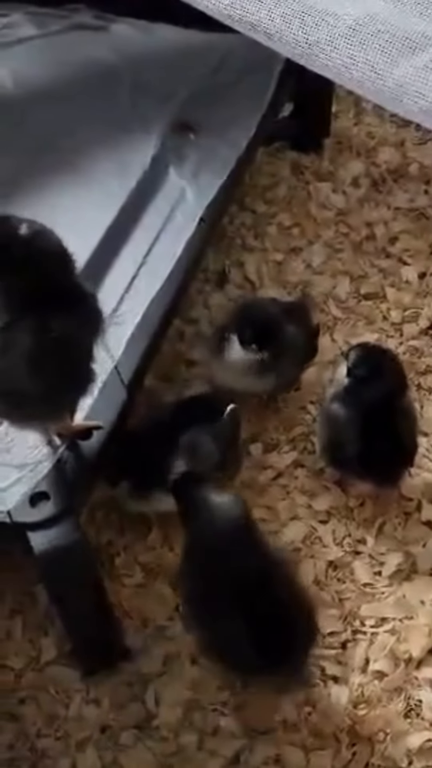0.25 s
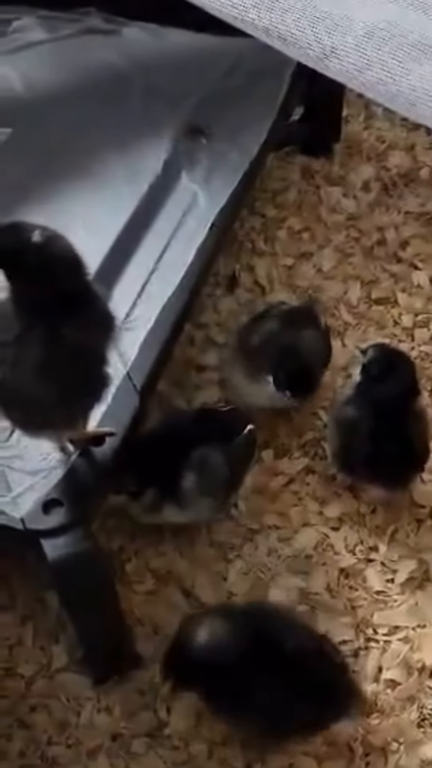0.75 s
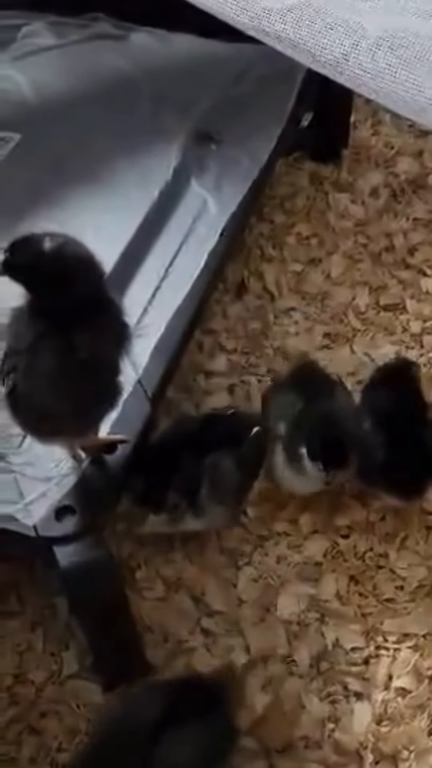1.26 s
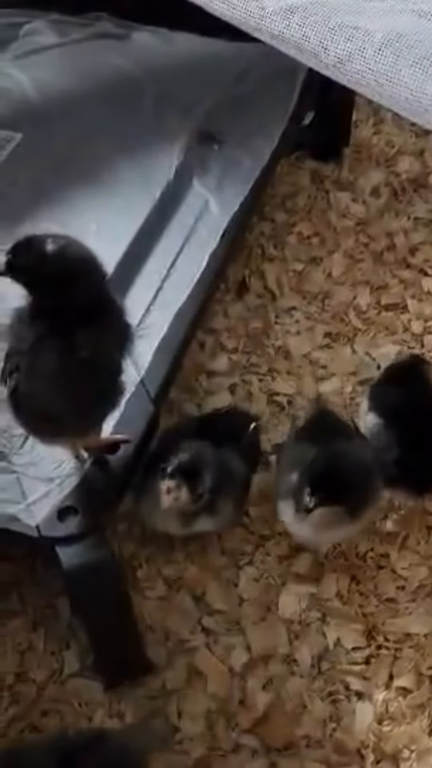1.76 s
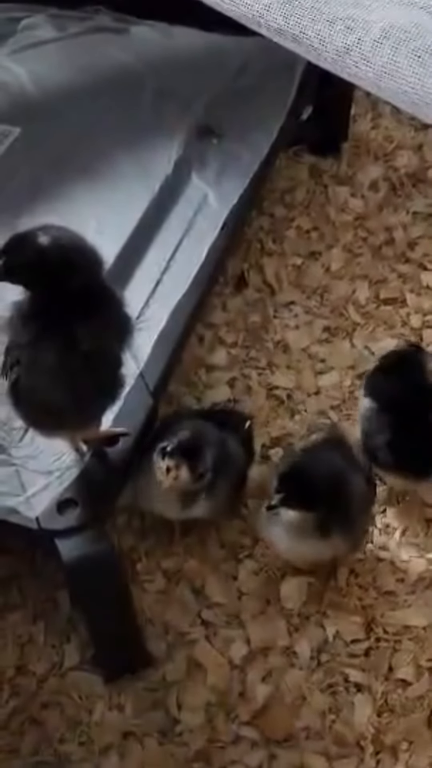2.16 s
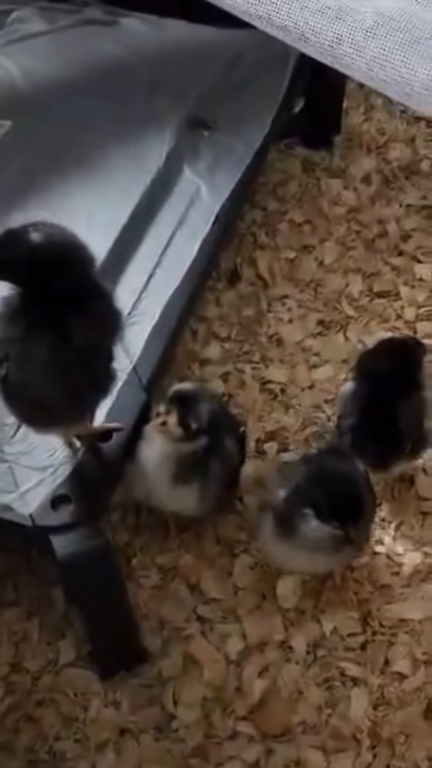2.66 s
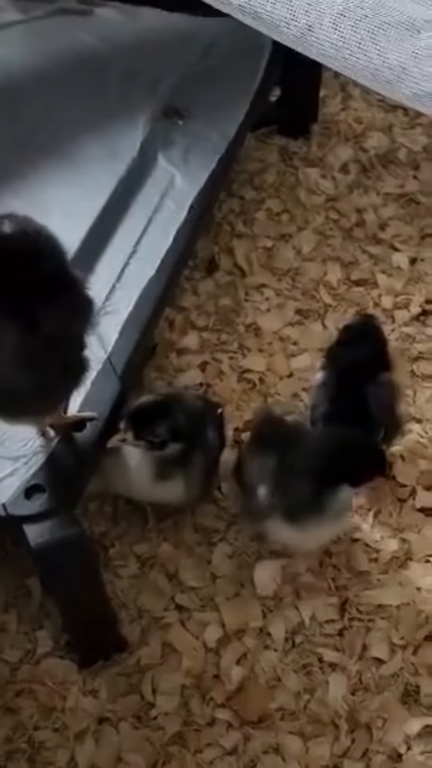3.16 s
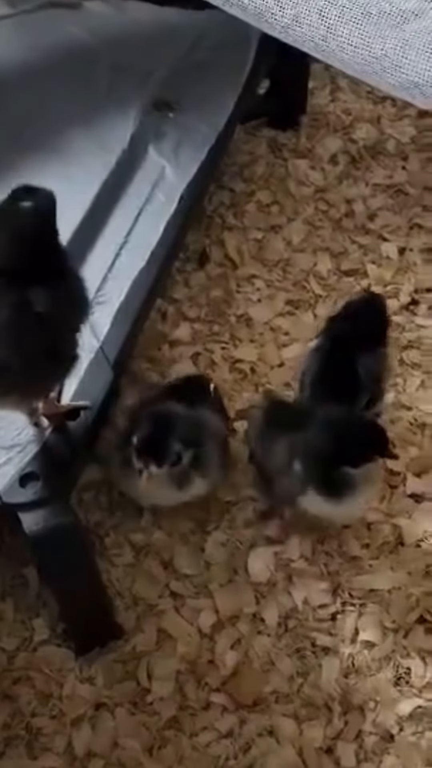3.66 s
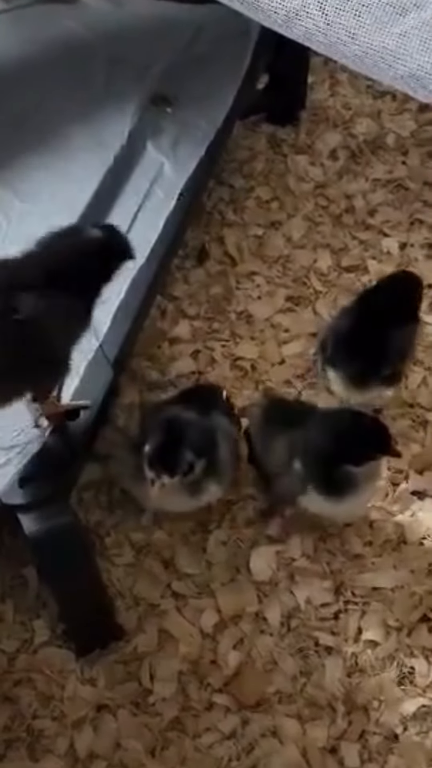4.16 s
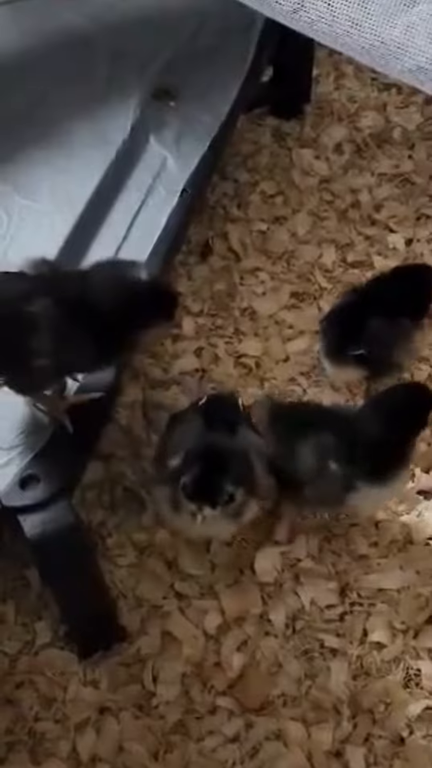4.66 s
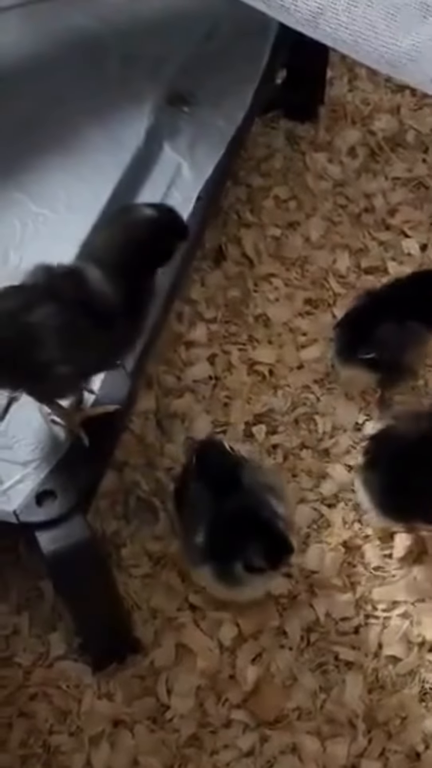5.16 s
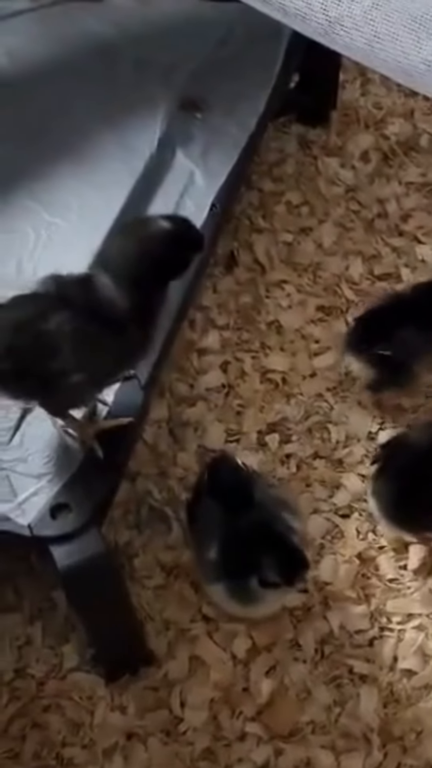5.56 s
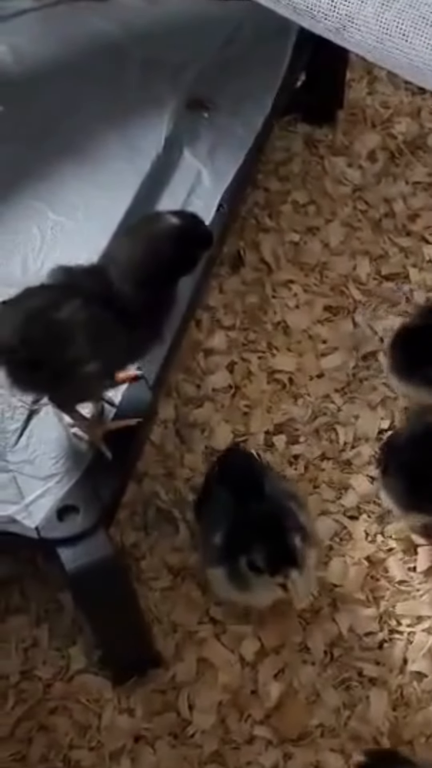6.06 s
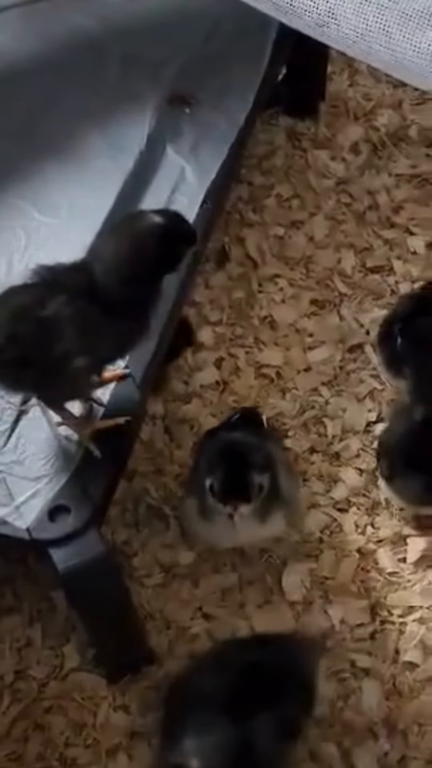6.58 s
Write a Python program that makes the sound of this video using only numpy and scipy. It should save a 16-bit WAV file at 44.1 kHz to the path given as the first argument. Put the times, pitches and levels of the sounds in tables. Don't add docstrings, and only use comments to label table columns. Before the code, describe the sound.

A low, steady fan rush with a faintly wavering motor hum runs throughout, under a dry whisper of feet in wood shavings. From 0.1 s a keen chick gives short falling whistles, with softer, lower peeps from another at 0.4-0.7 s. The keen one returns at 0.9-1.6 s, climbing in pitch, and again at 2.0-2.2 s among faint distant peeps, with a last one at 2.7 s. Crisp shavings tick at 2.25 s. Around 2.9-3.1 s small metal tags begin jingling close by, with a dull plate knock, then brighter hard shakes at 3.4-3.65 s. After a quieter gap another sharp clash comes at 4.2 s. A near chick peeps loudly at 4.6-5.0 s; far peeps and scuffs follow to 6 s. Jingles burst again at 5.9, 6.03 and 6.2-6.3 s, ringing briefly in the small soft room before rustling ends it.

```python
import sys
import numpy as np
from scipy import signal
from scipy.fft import rfft, irfft
from scipy.io import wavfile
from scipy.ndimage import uniform_filter1d

SR = 44100
rng = np.random.default_rng(int(sys.argv[2]) if len(sys.argv) > 2 else 0)


def waveform_to_disk(signal):
    frames = np.transpose(np.atleast_2d(signal))
    scaled = np.clip(frames, -1, 1) * 32767
    samples = np.round(scaled).astype(np.int16)
    wavfile.write(sys.argv[1], SR, samples)


def gain_from_db(level_db):
    decades = np.asarray(level_db, float) / 20
    return 10 ** decades


N = 300762

# (frequency [Hz], level [dB per Hz])
TAG_COLOUR = [(1760, -116), (3000, -90), (3360, -17), (3810, -23.5), (6600, -14.5), (8980, -5.5),
              (12400, 10.5), (13400, -1)]
SCUFF_COLOUR = [(240, -56), (400, -20.5), (1700, -4), (1950, -5), (2600, -5.5), (3050, -18), (3600, -12.5),
                (5000, -9), (6500, -60), (11000, -120)]
SHAVINGS_COLOUR = [(1760, -35.5), (3000, -10), (3510, -9), (5400, -12.5), (7410, -1.5), (9670, -8.5),
                   (12300, 0.5), (13200, -7), (13600, -20.5)]


def evened(x):
    return x / np.sqrt(np.mean(x ** 2) + 1e-20)


def read(points, hz):
    f, value = np.transpose(points)
    return np.interp(np.log(hz + 1), np.log(f + 1), value)


def add(mix, s, sound):
    part = mix[..., round(s * SR):][..., :sound.shape[-1]]
    part += sound[..., :part.shape[-1]]


def play_all(source, table):
    mix = np.zeros((2, N))
    for row in table:
        add(mix, *source(*row))
    return mix


def coloured(x, points):
    gain = gain_from_db(read(points, np.fft.rfftfreq(x.shape[-1], 1 / SR)))
    return irfft(rfft(x) * gain, x.shape[-1])


def contacts(count, per_s, spread_db):
    when, size, sign = rng.random((8000, 3))[:count].T
    strength = gain_from_db(spread_db * np.minimum(-np.log(size + 1e-9), 3))
    return (when < per_s / SR) * strength * np.sign(sign - .5)


def ports(x, pan_db, lag):
    left = np.interp(np.arange(len(x)) - lag, np.arange(len(x)), x)
    return np.array([left * gain_from_db(pan_db / 2), x * gain_from_db(-pan_db / 2)])


def wash(colour, patchy_db, gusty_db, size):
    # (frequency [Hz], left-right likeness)
    likeness = [(130, 1), (280, 0.747), (600, 0.44), (1400, -0.083), (3000, 0.042), (9000, 0.59)]
    # (frequency [Hz], left-right [dB])
    left_port = [(150, -0.5), (370, 1), (700, 1), (4000, 1.5), (13000, -6)]
    frames, hz = 4 * N // size + 5, np.fft.rfftfreq(size, 1 / SR)
    a, b, c, d, patches = rng.standard_normal((frames, len(hz), 5)).T
    patches = uniform_filter1d(patches, size=16, axis=0)
    patches = evened(uniform_filter1d(patches, size=12, axis=1))
    gusts = evened(uniform_filter1d(rng.standard_normal(frames), size=4))
    same = np.clip(read(likeness, hz), -1, 1)[:, None]
    right = a + 1j * b
    left = same * right + np.sqrt(1 - same ** 2) * (c + 1j * d)
    left = left * gain_from_db(read(left_port, hz))[:, None]
    level_db = read(colour, hz)[:, None] + patchy_db * patches + gusty_db * gusts
    z = np.array([left, right]) * gain_from_db(level_db)
    return evened(signal.istft(z, nperseg=size, noverlap=3 * size // 4)[1][:, :N])


def fan():
    # (frequency [Hz], level [dB per Hz])
    air_colour = [(22, -28), (38, -25), (62, -6), (84, -6.5), (103, 3.5), (122, -4), (140, -14.5),
                  (165, -15), (200, -23), (300, -18), (900, -29), (1100, -33), (2000, -32.5), (4500, -49)]
    # (frequency [Hz], level [dB rms])
    motor = [(120, -55), (240, -58)  , (334, -64.5), (904, -73.5)]
    t = np.arange(N) / SR
    lines = np.zeros(N)
    for hz, db in motor:
        waver = evened(uniform_filter1d(rng.standard_normal(N // 100 + 1), size=60)).repeat(100)[:N]
        drift = uniform_filter1d(waver, size=400)
        lines += gain_from_db(db + 3 + 1.3 * drift) * np.sin(2 * np.pi * hz * t + 0.67 * drift)
    return gain_from_db(-44) * wash(air_colour, .8, 0.77, size=4096) + lines


def shuffle():
    # (time [s], level [dB])
    restlessness = [(0, -72.5), (.3, -61.5), (.6, -74), (1.1, -65.5), (1.4, -69), (1.9, -75), (2.3, -68.5),
                    (2.6, -79), (3.3, -63.5), (3.899, -71), (4.5, -73), (4.62, -67), (5.1, -61),
                    (5.45, -75.5), (5.8, -58.5), (6.45, -55), (6.82, -67)]
    s, db = np.transpose(restlessness)
    level = gain_from_db(np.interp(np.arange(N) / SR, s, db) + 3.5)
    return level * wash(SHAVINGS_COLOUR, 3.4, 2.9, size=1024)


def peep(row, pan_db, second_db, second_swell_db, late, bend, scoop_hz, swell_db, rise, fade, held, beak_db):
    start, length, db, top_hz, end_hz = row
    t = np.arange(-.33 * rise, length + held, 1 / SR)
    since = t - t[0]
    u = np.clip(t / length, 0, 1)
    fallen = u ** late - bend * np.sin(2 * np.pi * u) / (2 * np.pi)
    scoop = scoop_hz * np.exp(-since / .005)
    hz = top_hz - (top_hz - end_hz) * fallen - scoop
    turn = 2 * np.pi * np.cumsum(hz) / SR
    edges = np.sin(np.pi / 2 * np.clip(np.minimum(since / rise, (t[-1] - t) / fade), 0, 1)) ** 2
    level = gain_from_db(db + swell_db * u - max(swell_db, 0)) * edges
    beak_hz, beak_width_hz = 5660, 390
    beak = beak_db / (1 + ((2 * hz - beak_hz) / beak_width_hz) ** 2)
    effort = level / gain_from_db(-41)
    push = gain_from_db(second_db + second_swell_db * u ** 2 + beak) * effort ** 1.6
    tone = np.sin(turn) + push * np.sin(2 * turn) + 1.7 * push ** 2 * np.sin(3 * turn)
    far = np.clip((-36 - db) / 14, .2, .9)
    flutter = 1 + .3 * far * evened(uniform_filter1d(rng.standard_normal(6000), size=150))[:len(t)]
    paths = np.zeros(700)
    paths[[0, rng.integers(350, 700)]] = 1, .44 * far
    heard = np.sqrt(2) * signal.fftconvolve(level * flutter * tone, paths)
    return start + t[0], ports(heard, pan_db, -14)


def flock():
    # (start [s], length [s], level [dB], top [Hz], end [Hz])
    keen_chick = [
        (.142, 0.03, -41.5, 3670, 2674),
        (.294, 0.0282, -44, 3900, 2705),
        (.883, 0.031, -40, 3940, 2744),
        (1.0, 0.0338, -42, 4110, 2766),
        (1.134, 0.0368, -42.5, 4280, 2760),
        (1.459, .043, -44, 4340, 2860),
        (1.608, 0.042, -41, 4450, 3060),
        (2.027, .048, -41, 4475, 2902),
        (2.176, 0.051, -40, 4624, 2960),
        (2.693, 0.038, -40.5, 4390, 2780),
    ]
    shy_chick = [
        (.425, 0.026, -48, 3210, 2810),
        (.55, 0.032, -47.5, 3370, 2911),
        (.693, .05, -46.5, 3586, 2990),
    ]
    near_chick = [
        (4.614, 0.027, -43.5, 2970, 2450),
        (4.705, 0.031, -34, 3430, 2740),
        (4.822, 0.042, -33.5, 3510, 2868),
        (4.965, 0.053, -34, 3704, 2950),
        (5.38, 0.0513, -54, 3697, 2990),
    ]
    far_chicks = [(1.24, .036, -55, 2330, 2260), (1.765, 0.05, -55, 2950, 2520),
                  (1.766, 0.0465, -49.5, 2300, 2300), (1.888, .054, -52.5, 3300, 2200),
                  (2.1, 0.041, -54, 2740, 2400), (2.034, .04, -51, 3000, 2700),
                  (2.024, 0.017, -49, 4100, 3500), (2.04, .035, -48.5, 3300, 2300),
                  (1.485, 0.043, -57, 3600, 3400), (2.1, .032, -58, 3020, 2760),
                  (4.99, .062, -50, 2950, 2300), (5.082, .026, -54, 3220, 2960),
                  (5.248, .024, -55, 3070, 2830), (5.575, 0.078, -56.5, 2850, 2420),
                  (6, 0.0626, -54, 2620, 2360), (5.71, 0.0607, -48, 2980, 2600),
                  (5.882, 0.0398, -45.5, 3080, 2700)]
    # (left-right [dB], second harmonic at the start [dB], its swell [dB], lateness of the fall,
    # S bend of the fall, onset scoop [Hz], swell [dB], rise [s], fade [s], end held [s], beak lift [dB])
    keen_voice = (-6, -29, 0, 1.1, .48, 80, 2.5, .02, .017, .01, 17)
    shy_voice = (-6.5, -9, -3, 1.6, .05, 330, .8, .009, .012, .005, 0)
    near_voice = (-4.5, -24, -10, 1.45, .05, 260, -4.5, .009, .013, .004, 0)
    far_voice = (-1.5, -14, -2.5, 1.2, .05, 40, 2.5, .012, .014, .004, 0)
    mix = np.zeros((2, N))
    for rows, voice in ((keen_chick, keen_voice), (shy_chick, shy_voice),
                        (near_chick, near_voice), (far_chicks, far_voice)):
        for row in rows:
            add(mix, *peep(row, *voice))
    return mix


def tick(s, db, low_db, length):
    t = np.arange(4000) / SR
    grit = contacts(len(t), 2400, 1.7) + 0.32 * rng.standard_normal(len(t))
    fade = gain_from_db(-30 * t / max(length, .002) + db - 12.5) * np.minimum(t / 0.0011, 1)
    bright = evened(coloured(grit, SHAVINGS_COLOUR)) * fade
    dull = evened(coloured(grit, SCUFF_COLOUR)) * fade * gain_from_db(low_db)
    return s, bright * gain_from_db([[-2.5], [2.5]]) + ports(dull, 1, 6.8)


def ring(s, struck, hz, db, t60, drop_db):
    # (frequency [Hz], left-right [dB])
    ring_pan = [(1100, -7.5), (2112, -10.5), (3430, -1), (3870, -0.5), (6830, -1.5), (8340, -4),
                (10170, -11.5), (12200, -6.5)]
    # (frequency [Hz], lead of the left port [radians])
    ring_lead = [(2112, -1.27), (2500, -1.5), (3430, 1.46), (3870, 1.24), (6830, -1.6), (8340, -1),
                 (10170, -1.3), (12200, 0.7)]
    t = np.arange(SR // 2) / SR
    uneven = evened(uniform_filter1d(rng.standard_normal(len(t)), size=200))
    blows = 1 + 0.4 * uneven * np.exp(-t / 0.14)
    t = t[t < struck + t60]
    beating = np.exp(2j * np.pi * (rng.uniform(45, 130) * t + rng.random((2, 1))))
    twin = 1 + .35 * np.exp(-t / 0.15) * beating
    after = np.maximum(t - struck, 0)
    rise = np.minimum(t / (0.36 * struck), 1) ** 1.4
    fall = gain_from_db(db - 60 * after / t60 + drop_db * np.minimum(after / .005, 1))
    level = rise * fall * np.sqrt(np.cos(np.pi * t))
    tone = np.exp(2j * np.pi * hz * t + 1j * np.array([[read(ring_lead, hz)], [0]]))
    pan = gain_from_db(read(ring_pan, hz) * np.array([[.5], [-.5]]))
    return s, np.sqrt(2) * blows[:len(t)] * level * (twin * tone).real * pan


def rings():
    # (time [s], struck for [s], level [dB]))
    plate_rings = [
        (897, 0.016, -3, [(6.078, 0.004, -36.5), (6.221, .004, -42.5)]),
        (1128, 0.052, -2, [(2.93, .045, -45.5)]),
        (2006, .15, -3.5, [(4.23, 0.035, -41), (5.944, 0.045, -52.5), (6.03, 0.036, -49.5)]),
        (2112, 0.33, -19.5, [(2.722, 0.0074, -47), (2.897, 0.012, -45.5), (2.903, .08, -33.5)]),
        (2545, .06, -8.5, [(3.4, 0.047, -51.5), (3.625, 0.026, -48), (4.195, 0.055, -43), (6.228, 0.023, -43)]),
        (2810, 0.076, 7, [(2.04, 0.026, -52), (6.03, .03, -54)]),
    ]
    tag_rings = [(3463, .15, -12.5, [(3.632, 0.027, -36.5), (4.2, 0.065, -31), (6.03, 0.042, -39.5),
                 (6.228, 0.04, -36.5), (6.282, 0.032, -32.5)]), (3900, 0.16, -6, [(3.414, 0.026, -36.5)]),
                 (3872, 2.3, 0, [(3.642, 0.029, -52)]), (4194, .1, -10, [(2.925, 0.017, -48.5)]),
                 (4690, 0.11, -9, [(5.9, .065, -57), (6.045, .016, -36), (6.281, .008, -36),
                 (3.52, .02, -45), (3.64, 0.025, -44), (4.205, 0.0082, -39.5), (5.8, 0.012, -55)]),
                 (5170, 0.0182, 0, [(3.215, 0.0029, -52)]), (5310, 0.114, 4, [(5.262, 0.0185, -63)]),
                 (5420, .1, -7.5, [(6.23, 0.027, -45)]), (6250, .1, -15, [(2.925, 0.019, -47),
                 (6.018, 0.02, -33.5)]), (6830, .15, -6.5, [(3.615, 0.028, -34), (4.215, 0.039, -30.5),
                 (6.28, .035, -32)]), (7000, .08, -11, [(6.228, 0.0245, -33)]),
                 (7580, .08, -9, [(3.415, 0.016, -20.5), (4.232, 0.026, -25), (6.036, .024, -30.5)]),
                 (8364, .15, -5, [(3.63, 0.022, -34), (4.178, 0.0143, -37.5), (4.188, 0.031, -20.5),
                 (6.276, .055, -39)]),
                 (9470, .2, -5, [(3.0, .03, -54), (3.41, 0.0406, -41), (6.028, 0.027, -36)]),
        (10190, 0.42, 0, [(3.08, .01, -47.5), (3.619, 0.043, -36.5), (4.208, 0.067, -37)]),
        (10320, 0.27, -11.5, [(4.21, 0.016, -23), (6.208, 0.019, -36), (6.28, 0.027, -24.5)]),
        (10940, .1, -7, [(2.91, .045, -41)]),
        (11290, .09, -3, [(3.397, 0.036, -26), (6.21, 0.031, -25.5)]),
        (11400, .18, -2, [(4.222, .041, -34), (6.075, 0.023, -44)]),
        (11960, 0.11, -2.5, [(2.905, 0.054, -34), (3.398, 0.032, -26.5)]),
        (12220, .1, -8, [(6.207, 0.0286, -24.5)]),
        (12500, .05, -4, [(3.075, 0.0056, -37)]),
        (12915, 0.22, -5, [(2.922, 0.056, -36), (5.927, 0.015, -24), (5.952, 0.018, -31)]),
    ]
    mix = np.zeros((2, N))
    for hz, t60, drop_db, blows in plate_rings + tag_rings:
        for s, struck, db in blows:
            add(mix, *ring(s, struck, hz, db, t60, drop_db))
    return mix


def tags(hz_lo, hz_hi, colour, effort, longest, count):
    t, out = np.arange(2800) / SR, 0
    for group in range(count):
        hz = hz_lo + (hz_hi - hz_lo) * (np.arange(6)[:, None] + rng.random((6, 1))) / 6
        t60 = longest * rng.uniform(0.31, 1, (6, 1))
        db = read(colour, hz) + 3.6 * rng.standard_normal((6, 1)) - 60 * t / t60
        level = gain_from_db(db) * np.minimum(t / 0.00096, 1)
        far = rng.normal(0, 1.56, (6, 1))
        tones = [(level * np.sin(2 * np.pi * hz * t + lead)).sum(0) for lead in (far, 0)]
        hits = contacts(len(effort), 600, 4.66) * effort
        out = out + signal.fftconvolve(hits[None], tones, axes=1)
    return out * np.sqrt(np.sum(effort ** 2) / np.sum(out ** 2) * 2)


def shared(modes, effort):
    t, out = np.arange(3600) / SR, 0
    for hz, db, t60 in modes:
        luck_db, far = rng.standard_normal(2) * [3.0, 1.3]
        fade = gain_from_db(db + luck_db - 60 * t / (0.65 * t60))
        tone = fade * np.sin(2 * np.pi * hz * t + np.array([[far], [0]]))
        hits = contacts(len(effort), 350, 4.5) * effort
        out = out + signal.fftconvolve(hits[None], tone, axes=1)
    return out * np.sqrt(np.sum(effort ** 2) / np.sum(out ** 2) * 2)


def jingle(swings):
    # (frequency [Hz], level [dB], t60 [s])
    low_tag = [(3420, -19, 0.16), (3830, -22, 0.12), (4645, -16, 0.068), (5120, -20, 0.07),
               (5384, -20, 0.14), (5830, -20.5, 0.052), (6450, -16.5, 0.16), (6657, -13.5, 0.08),
               (6650, -13.5, .12), (7360, -12.5, 0.076), (7440, -11, 0.11), (7840, -13, .16),
               (8300, -14, 0.16)]
    high_tag = [(8950, -11.5, .12), (9460, -9.5, .14), (10100, -13.5, 0.13), (10500, -9.5, .12),
                (10550, -6, .08), (11000, -3.5, .08), (11535, -2.5, 0.26), (11880, -2, 0.13),
                (12150, -2.5, 0.12), (12840, -6.5, .15), (12840, -3.5, .11)]
    carrier = [(1127.4, -5.5, .06), (1434, -4.5, 0.036), (1705, 1, 0.062), (2080, -1.5, 0.078),
               (2380, -5.5, .05), (2593.8, -6, 0.053), (2860, -12, 0.045)]
    start, held, effort_db, lower_db, scuff_db = np.transpose(swings)[..., None]
    t = np.arange(start.min(), (start + held).max() + .088, 1 / SR)
    after = np.maximum(t - start - held, 0)
    fall = gain_from_db(-1501 * after) + gain_from_db(-18.5 - 152 * after)
    effort = gain_from_db(effort_db) * np.clip((t - start) / .013, 0, 1) ** 1.19 * fall
    full = effort.sum(0)
    lower_effort = (effort * gain_from_db(lower_db)).sum(0)
    scuff_effort = (effort * gain_from_db(scuff_db)).sum(0)
    bright = tags(8500, 13200, TAG_COLOUR, full, 0.078, count=3) * gain_from_db([[-3.5], [3.5]])
    lower = tags(3300, 8500, TAG_COLOUR, lower_effort, 0.088, count=3) * gain_from_db([[-1.5], [1.5]])
    dull = ports(tags(600, 4380, SCUFF_COLOUR, scuff_effort, 0.025, count=4)[1], -1.5, 9.4)
    high = shared(high_tag, full) * gain_from_db([[-3.0], [3.0]])
    low = shared(low_tag, lower_effort) * gain_from_db([[-2.2], [2.2]])
    plate = shared(carrier, scuff_effort) * gain_from_db([[-2.4], [2.4]])
    out = gain_from_db(-4) * (high + low)
    add(out, 0, gain_from_db(-2.5) * bright + gain_from_db(-3.0) * lower + gain_from_db(-3.5) * dull)
    return start.min(), out + gain_from_db(-5.2) * plate


def knock(s, db, hz):
    cycles = 1.2
    u = np.arange(900) / SR * hz / cycles
    blow = gain_from_db(db) * np.e * u * np.exp(-u) * np.sin(2 * np.pi * cycles * u)
    return s, ports(blow, -5.0, 9.2)


def strike(s, db):
    t = np.arange(600) / SR
    hz = rng.uniform(3300, 13000, (14, 1))
    fade = gain_from_db(read(TAG_COLOUR, hz) * .4 - 60 * t / 0.0076)
    crack = (fade * np.sin(2 * np.pi * hz * t)).sum(0)
    return s, ports(gain_from_db(db - 4.0) * crack / abs(crack).max(), -3.0, 9.8)


def room(x):
    # (frequency [Hz], t60 [s])
    room_t60 = [(500, 0.34), (3000, 0.47), (12000, 0.13)]
    taps = np.zeros((2, SR // 2))
    grid = np.arange(120, SR // 2 - 20, 20)
    at = grid + rng.integers(0, 20, (2, len(grid)))
    near_walls = 1 + 3.6 * np.exp(-grid / SR / 0.028)
    np.put_along_axis(taps, at, rng.choice([-1., 1.], at.shape) * near_walls, 1)
    hz, t, z = signal.stft(taps, SR, nperseg=256)
    tail = signal.istft(z * gain_from_db(-60 * t / read(room_t60, hz)[:, None]), SR, nperseg=256)[1]
    return signal.fftconvolve(x, tail / np.linalg.norm(tail[0]), axes=1)[:, :N]


def scene():
    # (time [s], peak [dB], low part [dB], length [s])
    ticks = [(0.254, -39.5, -12, 0.02), (2.032, -41.5, 2.5, 0.1), (2.25, -29, -29, 0.023),
             (2.499, -46, -19, 0.0255), (2.733, -40, -18, 0.057), (2.817, -40, -6.5, 0.024),
             (3.077, -34, -17, 0.026), (3.125, -30, 11, 0.02), (3.216, -33, 8, 0.022),
             (3.341, -42, 4, 0.029), (4.577, -38.5, -2.5, 0.075), (4.904, -41, 5, 0.043),
             (5.105, -27.5, -16, 0.013), (5.115, -40.5, 4, .03), (5.269, -41, -2.5, 0.05),
             (5.4494, -55.5, 7.5, 0.018), (5.598, -44.5, -3, 0.021), (5.649, -46, -8, 0.019),
             (5.7281, -34.5, -2, 0.049), (5.895, -36.5, 7, 0.038), (6.498, -35, -1, 0.1),
             (6.631, -38, -21, 0.063), (6.8114, -40, -11, 0.018)]
    # (start [s], held [s], effort [dB], lower tones [dB], dull scuff [dB])
    shakes = [
        [(2.897, 0.043, -34.5, -11.5, -17), (2.945, .036, -30, -6, -9)],
        [(3.068, 0.0094, -35.5, -6, -14), (3.115, 0.012, -47, 4, 6)],
        [(3.388, .016, -23.5, -7, -15), (3.417, 0.025, -26, 2, -20.5)],
        [(3.482, .012, -34.5, 2.5, 1.5), (3.502, 0.031, -44, 2.5, 10)],
        [(3.584, 0.027, -25, 0.5, -8), (3.612, 0.03, -19.5, -2.5, -20)],
        [(4.176, 0.0099, -40, -1, -15), (4.194, .026, -20, -4, -24), (4.215, 0.042, -18.5, -3.5, -18.5)],
        [(5.797, 0.0093, -43.5, 3, 5)],
        [(5.902, 0.021, -37, -9.5, 0.5), (5.922, .008, -26, -11, -2), (5.948, 0.012, -38, -14, -4.5)],
        [(6.003, 0.026, -26, -2.5, -12.5), (6.022, 0.027, -20.5, -4, -17.5), (6.06, 0.0163, -34, -7, -5.5)],
        [(6.198, 0.023, -29.5, -7, -10), (6.222, 0.0072, -18, -4, -15), (6.238, 0.0173, -30.5, 0.5, -16)],
        [(6.273, 0.0287, -28, -1.5, -14.5)],
    ]
    # (time [s], peak [dB], frequency [Hz])
    knocks = [(2.967, -39, 2450), (3.1255, -24.5, 1130), (3.126, -21.5, 2020), (3.396, -40, 1160),
              (3.397, -41, 2080), (3.492, -31, 1630), (3.493, -39, 890), (3.519, -27, 1410),
              (3.529, -26, 1700), (3.594, -30, 1300), (3.603, -38.5, 1096), (4.203, -35, 2380),
              (4.226, -29, 2035), (5.806, -47, 1710), (5.807, -48, 994), (5.911, -28, 1743),
              (6.009, -32, 1740), (6.027, -29, 1800), (6.158, -43, 809), (6.205, -41, 1720),
              (6.227, -33, 2520), (6.286, -33, 2020)]
    # (time [s], peak [dB])
    strikes = [(2.9734, -19), (2.9769, -19), (3.0764, -25), (3.0794, -27), (3.4045, -10), (3.4274, -8),
               (3.4405, -11), (3.6017, -16), (3.6323, -8), (3.6371, -11), (3.6453, -13), (4.2039, -14),
               (4.2152, -12), (4.2432, -15), (4.2534, -13), (5.9137, -9), (5.9337, -15.5), (6.0374, -6),
               (6.0481, -8), (6.056, -13), (6.2305, -8), (6.258, -14), (6.2866, -15), (6.2924, -12),
               (6.3034, -9)]
    steady = fan() + shuffle()
    close = flock() + play_all(tick, ticks) + rings()
    for swings in shakes:
        add(close, *jingle(swings))
    close += play_all(knock, knocks) + play_all(strike, strikes)
    return close + room(gain_from_db(-10.0) * close) + steady


def thin_out(x, bin_db, band_db, quiet_db, luck_db):
    hz, t, z = signal.stft(x, SR, nperseg=2048, noverlap=1536)
    power = (abs(z[:, :1024]) ** 2).mean(0).reshape(64, 16, -1).mean(1) + 1e-16
    apart = np.subtract.outer(np.arange(64), np.arange(64))
    spread = gain_from_db(-np.where(apart > 0, 5., 9.) * abs(apart))
    mask = spread @ power
    luck = luck_db * rng.standard_normal((64, len(t) // 4 + 1)).repeat(4, axis=1)[:, :len(t)]
    limit = mask * gain_from_db(2 * band_db) + gain_from_db(2 * quiet_db)
    band_over_db = 10 * np.log10(power / limit) + luck
    bin_power = abs(z[:, :1024]) ** 2
    bin_over_db = 10 * np.log10(bin_power / mask.repeat(16, axis=0) + 1e-16) - bin_db
    kept = (1 + np.tanh(band_over_db.repeat(16, axis=0))) * (1 + np.tanh(bin_over_db / 2)) / 4
    high = np.clip(hz[:1024, None] / 1200 - 1, 0, 1)
    z = np.concatenate([z[:, :1024] * (1 - high * (1 - kept)), z[:, 1024:]], axis=1)
    return signal.istft(z, SR, nperseg=2048, noverlap=1536)[1][:, :N]


def top_cut(x):
    return signal.sosfilt(signal.butter(12, 14140, fs=SR, output="sos"), x)


def record(dry):
    low_pass = signal.firwin(255, 13250, window=("kaiser", 7), fs=SR)
    limited = signal.oaconvolve(dry, low_pass[None], "same")
    mix = thin_out(limited, bin_db=-17, band_db=-21, quiet_db=-101, luck_db=7.6)
    return top_cut(mix)


dry = scene()
out = record(dry)
waveform_to_disk(out)
```